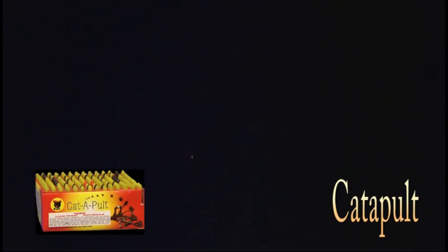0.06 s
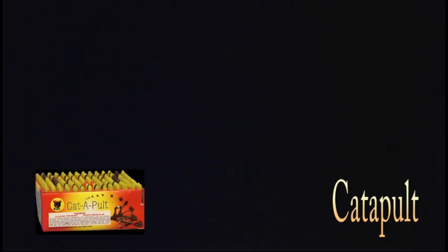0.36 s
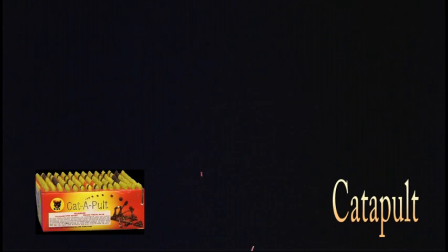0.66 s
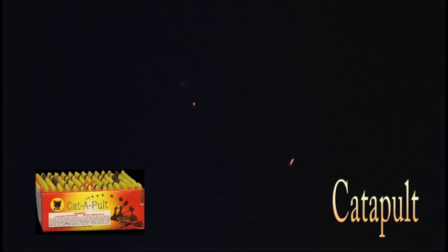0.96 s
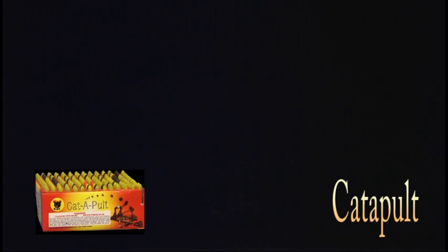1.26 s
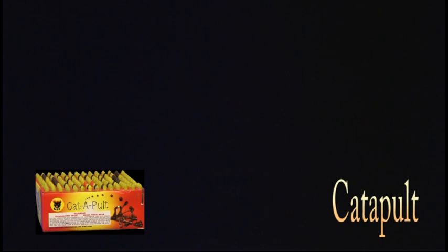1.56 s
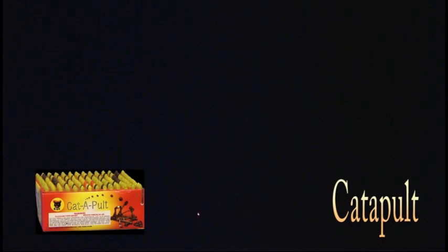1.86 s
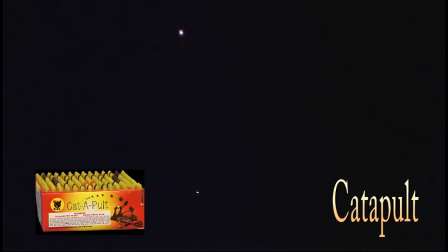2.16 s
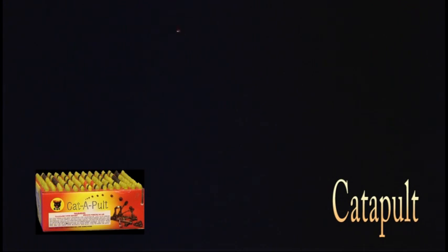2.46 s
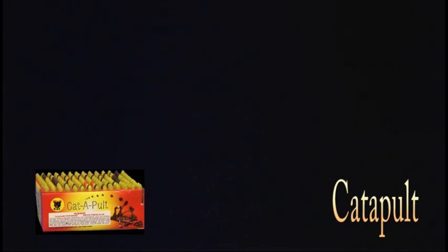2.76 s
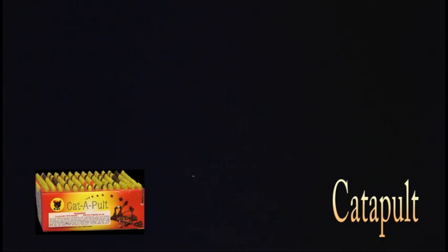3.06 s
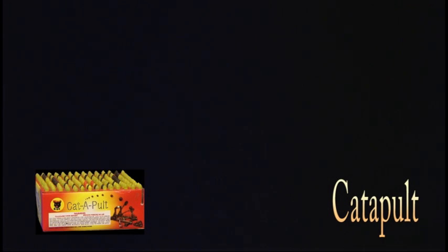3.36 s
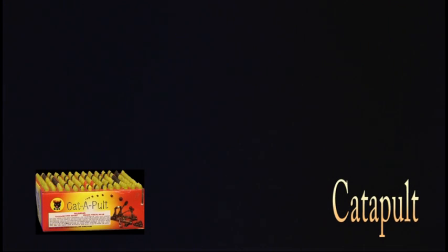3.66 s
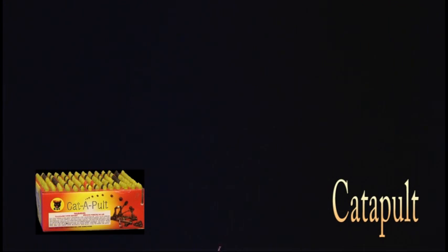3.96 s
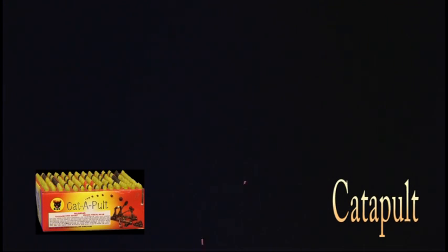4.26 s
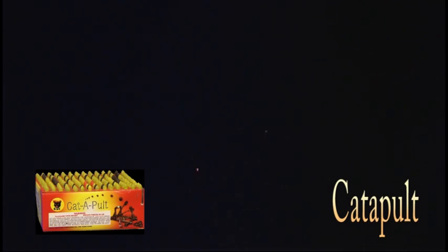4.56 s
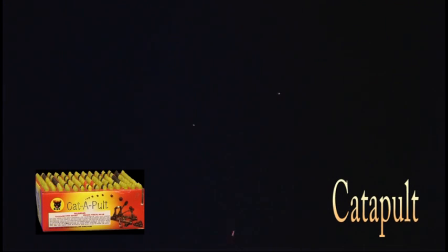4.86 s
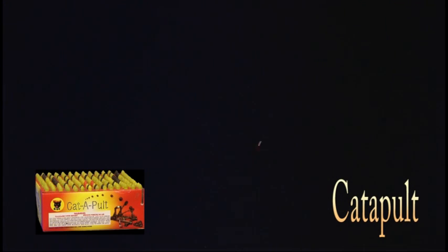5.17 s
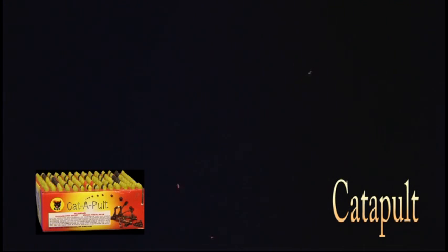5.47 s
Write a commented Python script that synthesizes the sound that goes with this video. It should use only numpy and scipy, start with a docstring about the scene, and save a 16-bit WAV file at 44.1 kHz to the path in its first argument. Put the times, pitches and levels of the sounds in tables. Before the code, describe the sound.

Small firework rockets go off outdoors on a still night. From the start, shrill whistles with a light hiss overlap, wavering and slowly sinking in pitch, over the fading echo of an earlier bang. A sharp, very loud bang hits at 0.5 seconds. A launch pop cracks at 1.3, followed by bangs at about 1.4 and 1.7. Each bang overloads the microphone, slaps off nearby walls and rolls back from distant trees half a second later. The whistles sweep upward as they burn out, the last by 2.1 seconds. A lull follows, with fading echo, faint fizzing and a spark snap at 2.4. Another bang comes at 3.5, with brief fizz and a snap. From 3.8 seconds new whistles enter one after another, bending and piling up, with small launch pops from 4.6, and continue to the end near 5.7 seconds.

```python
"""Outdoors at night, a box of small firework rockets goes off. A small charge pops rockets out of their
tubes. Pulsing flames make them whistle and hiss as they climb, and the pitch sinks as they burn hollow.
Bursts crack loudly enough to overload the microphone, and sparks fizz and snap. The ground and nearby
walls echo within about 50 ms; distant trees answer about half a second later with a long wash."""
import sys
import numpy as np
from scipy import signal
from scipy.fft import rfft, irfft
from scipy.io import wavfile
from scipy.ndimage import map_coordinates

SR = 44100
rng = np.random.default_rng(int(sys.argv[2]) if len(sys.argv) > 2 else 0)


def transcribe(u):
    """Save the signal u as a 16-bit wav file named by the first command-line argument.

    u: samples, shape (n,) or (channels, n), limited to [-1, 1]; the rate is SR.
    q: integer samples, one column per channel.
    """
    v = np.clip(np.atleast_2d(u).T, -1, 1)
    q = np.round(v * 32767).astype(np.int16)
    wavfile.write(sys.argv[1], SR, q)


N = 251811
TIME = np.arange(N) / SR

# whistling rockets: (name, lift-off [s], end [s], starting pitch [Hz], growth of the hollow [share],
# level [dB], fade while flying off [dB/s], overtone boost [dB])
ROCKETS = [("a", -.1, 0.55, 2868, .24, -19.5, 2.3, -2), ("b", .18, 1.5, 3560, .5, -19.5, 0.55, -2.5),
           ("c", .135, 1.258, 3505, .36, -19.5, -0.57, 2.8), ("d", 1.26, 2.09, 3510, .37, -16.5, 10, 3.5),
           ("e", 3.765, 5.75, 3095, .45, -18, 1.8, 2.1), ("f", 4.09, 5.42, 3038, .38, -20, -2.5, 1.7),
           ("g", 4.6, 5.75, 2875, .28, -15, 6.6, 2), ("h", 5.03, 5.75, 2952, .28, -18.5, 1, 2),
           ("i", 5.28, 5.75, 2882, .2, -17.5, 4.2, 0), ("j", 5.64, 5.75, 3000, 0.304, -18.5, 0, 5.7)]
# swerves bend a whistle up and back: (rocket, time [s], half length [s], rise [share], level change [dB])
SWERVES = [("a", .51, .119, .11, 2.7), ("b", .47, .136, .076, -1), ("b", .68, .097, .271, 0.68),
           ("b", 1.125, .089, .096, -0.83), ("c", .77, .095, .115, 0), ("c", 0.98, .09, .255, -1),
           ("c", 1.23, .11, .66, -.5), ("d", 1.822, .042, .114, -11.5), ("e", 4.39, .075, .13, -4.5),
           ("e", 4.86, .083, .041, 0), ("e", 5.225, .19, .085, -3), ("f", 4.4, .119, .049, -1),
           ("f", 4.733, .056, .134, -1.7), ("f", 5.1, .047, .105, 0.62), ("g", 4.825, .159, .046, 0.72),
           ("g", 5.25, .083, .114, -4), ("g", 5.735, .064, 0.14, 2.2), ("h", 5.645, .084, .05, -2.5),
           ("i", 5.338, .025, .164, -5)]
# burn-outs sweep a whistle up: (rocket, start [s], top [s], rise [share], level change [dB])
BURNOUTS = [("b", 1.265, 1.52, 1.1, -21), ("c", 1.176, 1.194, 0.28, -6.5), ("d", 1.905, 2.085, 1.15, -9)]
# the pure tones in a whistle: (multiple of the tube's lowest note, level [dB])
PARTIALS = [(1, -34.5), (2, 4), (3, -18), (4, -16.5), (5, -26), (6, -22), (7, -24), (8, -28), (9, -34.5),
            (10, -33)]
# treble lost on the way to the microphone: (frequency [Hz], level [dB])
AIR_LOSS = [(3000, -5), (5500, -2), (7000, -6.5), (8500, -3.5), (10000, -6), (12000, -6.5), (13500, -19),
            (15000, -15), (16000, -28)]
# bursts: (time [s], level [dB], ground echo lag [ms], wall echo lag [ms], far wall echo lag [ms],
# tree echo level [dB], tree echo stretch [factor])
BURSTS = [(-.27, 19, 7, 21, 40, -1, 1), (.5129, 19, 7.5, 20, 40.8, -5, 1),
          (1.3545, 19, 6.1, 22.3, 39.3, -5, 1), (1.6578, 20, 7.1, 20.4, 40.3, -2.2, 1.13),
          (3.5335, 20, 4.3, 25.1, 37.8, -2, .97)]
# pops of the charges that lift the rockets: (time [s], level [dB])
LAUNCH_POPS = [(1.256, -9), (4.5893, -11.5), (4.766, -24), (5.0328, -17), (5.357, -18.5), (5.626, -11.5),
               (5.69, -13)]
# showers of sparks: (peak time [s], level [dB], rise [dB/s], fall [dB/s])
SPARK_SHOWERS = [(1.68, -25, 1000, 107), (2.2, -44, 20, 53), (2.45, -42, 130, 115), (3.57, -33, 830, 150),
                 (3.7, -36, 114, 90)]
# sharp snaps, the bright crack of the first launch pop and then two sparks: (time [s], level [dB])
SHARP_SNAPS = [(1.258, 1), (2.443, -8), (3.741, -11)]
# what echoes, from close clutter to the farthest trees: (lag [s], level [dB], rise [dB/s], fall [dB/s])
REFLECTORS = [(.04, 23, 1500, 520), (.18, 9.5, 166, 80), (.58, 13.5, 30, 42), (1.0, 2, 22, 14.5)]
# tone colours of the noises and echoes: (frequency [Hz], level [dB])
JET_COLOUR = [(100, -31), (400, -13.5), (1300, -12.5), (2700, 2.5), (4500, 0.5), (7000, -5), (10000, -7),
              (15000, -39)]
FIZZ_COLOUR = [(200, 1), (1500, 0.5), (4000, 3), (8000, -4.5), (11000, -19), (15000, -39)]
CLUTTER_COLOUR = [(100, -25), (300, -10), (600, -3), (1500, 3.5), (2500, -8), (5000, -16.5), (9000, -20.5),
                  (15000, -36)]
TREE_COLOUR = [(60, -27), (150, -16), (220, -16.5), (320, -9), (480, -3), (700, 1), (1000, 1.5),
               (1400, 4.5), (2100, -0.5), (3000, -9), (4500, -9), (8000, -33), (15000, -54)]
NIGHT_COLOUR = [(30, -4), (100, -9), (400, -9), (1200, -9.5), (4000, -15), (9000, -8), (15000, -11)]

TOP_HZ = 15900  # upper limit of the treble


def rockets(direct_db=-3, ground_db=-10, wall_db=-7, far_wall_db=-18, jet_db=-23, sputter_db=-37):
    """All the whistles, with the hiss of their jets, the sputter of their fuel and their echoes."""
    out, power = np.zeros((2, N)), np.zeros((1, N))
    side_ms = 0.0085  # lag between left and right
    for rocket in ROCKETS:
        start, end = rocket[1:3]
        t = np.arange(start, end + .05, 1 / SR)
        tone, thrust = whistle(t, rocket)
        heard = undb(direct_db) * np.array([tone, delayed(tone, side_ms)])
        # as the rocket climbs, the ground echo comes later and the wall echoes sooner
        climb = 1 - np.exp(-(t - start) / .6)
        heard += undb(ground_db) * delayed(tone, 1 + 6 * climb)
        heard += undb(far_wall_db) * delayed(tone, 48 - 8 * climb)
        # the wall stands to the right, so its echo reaches the left side later
        heard += undb(wall_db) * np.array([delayed(tone, 28 - 7 * climb + s * side_ms) for s in (1, -1)])
        add(out, heard, start)
        add(power, thrust[None] ** 2, start)
    jet = undb(jet_db) * noise(JET_COLOUR, 1.0) * undb(2.1 * wander(54))
    sputter = undb(sputter_db) * noise(FIZZ_COLOUR, 0.77)
    out += np.sqrt(power) * (jet + sputter)
    mono = out.mean(0, keepdims=True)
    near = undb(-7) * signal.fftconvolve(mono, scatter(0.18, 1.0))[:, :N]
    far = undb(-18) * signal.fftconvolve(mono, tree_echo(stretch=0.96))[:, :N]
    return pan(out + near, left_db=1.35) + far


def whistle(t, rocket, jitter=0.00752, waver=0.00451, flutter_db=1.75, rasp_db=3.5, patchy_db=3.5):
    """A pulsing flame makes the rocket's tube ring; gives the tone and its strength (thrust)."""
    hz, thrust, overtones_db = flight(t, *rocket)
    thrust = thrust * undb(flutter_db * wander(200, t))
    unsteady = 1 + 1.74 * np.exp(-(t - t[0]) / .06)  # the flame is rougher just after lift-off
    # the pitch one hears is twice the tube's lowest note
    lowest_hz = hz / 2 * (1 + jitter * unsteady * wander(900, t) + waver * wander(70, t))
    phase = 2 * np.pi * np.cumsum(lowest_hz) / SR
    odd_db = -12 * np.clip((lowest_hz - 1350) / 300, 0, 1)  # a high pitch weakens the odd multiples
    tone = 0
    for k, partial_db in PARTIALS:
        k = round(k)
        db = partial_db + curve(AIR_LOSS, k * lowest_hz) + odd_db * (k % 2)
        if k != 2:  # all but the main tone come and go, each on its own
            db += overtones_db + patchy_db * wander(25, t) + rasp_db * wander(300, t) / np.sqrt(2)
        tone = tone + undb(db) * np.sin(k * phase) * (k * lowest_hz < TOP_HZ)
    return np.sqrt(2) * tone * thrust, thrust


def flight(t, name, start, end, first_hz, growth, db, fade_db_per_s, bright_db,
           burn_s=.75, swing_db=7, attack_s=0.04, release_s=0.029):
    """Pitch, thrust and overtone level of one rocket: the note sinks as the tube burns hollow."""
    age = t - start
    hz = first_hz / (1 + growth * (1 - np.exp(-age / burn_s)))
    turn_db = 0
    for who, when, half_s, rise, change_db in SWERVES:
        if who == name:
            # the nozzle points away while the pitch rises and swings back as it falls
            progress = (t - when) / half_s
            bend = np.exp(-progress ** 2)
            hz *= 1 + rise * bend
            turn_db += (change_db + swing_db * progress) * bend
    for who, when, top, rise, change_db in BURNOUTS:
        if who == name:
            sweep = np.sin(np.pi / 2 * np.clip((t - when) / (top - when), 0, 1)) ** 2
            hz *= 1 + rise * sweep
            turn_db += change_db * sweep
    burning = np.clip(np.minimum(age / attack_s, (end - t) / release_s), 0, 1)
    thrust = burning * undb(db - fade_db_per_s * age + turn_db)
    # overtones fade faster with distance and travel in a beam, so turns affect them more
    overtones_db = bright_db - 2 * age + 0.2 * turn_db
    return hz, thrust, overtones_db


def bursts():
    """Each crack arrives directly, off the ground and off the walls, then rolls back from the trees."""
    out = np.zeros((2, N))
    for when, db, ground_ms, wall_ms, far_wall_ms, trees_db, stretch in BURSTS:
        # (lag [ms], level [dB], push [ms]); small surfaces return only treble, a shorter push
        paths = [(0, 1, .24), (3.3, -12, .1), (ground_ms, -3, .25), (wall_ms, 3, .17),
                 (wall_ms + ground_ms, -13, .25), (far_wall_ms, -16, .08)]
        for lag_ms, path_db, push_ms in paths:
            tearing = highpass(scatter(.005), 900)
            crack = lowpass(blast(push_ms), 7000) + tearing + undb(-11) * scatter(.055)
            add(out, pan(undb(db + path_db) * crack, left_db=2.4), when + lag_ms / 1000)
        add(out, undb(db - 5) * scatter(.075), when + wall_ms / 1000)  # the uneven wall smears its echo
        add(out, pan(undb(db + trees_db) * tree_echo(stretch), left_db=-0.0075), when)
    return highpass(out, 337)


def blast(push_ms, size=8192):
    """A blast wave: a sudden push of air, then a longer and weaker pull."""
    progress = (np.arange(size) + .5) / SR * 1000 / push_ms
    return (1 - progress) * np.exp(-progress)


def launches(wall_lag_s=.0285, wall_db=-2, rattle_db=8, thump_hz=155):
    """The lifting charge knocks in its tube and shakes the box; the wall answers."""
    out = np.zeros((2, N))
    cycles = TIME[:8192] * thump_hz
    thump = undb(-38) * np.sin(2 * np.pi * cycles) * cycles * np.exp(1 - 1.3 * cycles)
    for when, db in LAUNCH_POPS:
        for lag_s, path_db in ((0, 0), (wall_lag_s, wall_db)):
            knock = highpass(blast(.2) + undb(rattle_db) * scatter(.03), 480) + thump
            add(out, undb(db + path_db) * knock, when + lag_s)
    return lowpass(out, 3500)


def fizz_and_snaps():
    """Showers of sparks fizz; the first launch pop gives a bright crack, and later two sparks snap."""
    out = noise(FIZZ_COLOUR, 0.71) * swells(SPARK_SHOWERS, TIME) * undb(0.95 * wander(70))
    for when, db in SHARP_SNAPS:
        add(out, highpass(undb(db) * scatter(0.018), 1260), when)
    return out


def scatter(decay_s, likeness=0.97, size=8192):
    """A short noisy tail, as from grass and clutter; it falls 60 dB in decay_s."""
    tail = noise(CLUTTER_COLOUR, likeness, size) * undb(-60 * np.arange(size) / SR / decay_s)
    return tail / np.sqrt(np.sum(tail ** 2) / 2)


def tree_echo(stretch, air_hz=3200, treble_db_per_s=-13, size=2 ** 17):
    """The long echo of distant trees; the air takes more treble from its later parts."""
    lag = np.arange(size) / SR
    wash = noise(TREE_COLOUR, 0.69, size)
    dull = signal.sosfiltfilt(signal.butter(2, air_hz, fs=SR, output="sos"), wash)
    treble = (wash - dull) * undb(treble_db_per_s * lag)
    echo = (dull + treble) * swells(REFLECTORS, lag / stretch)
    return echo / np.sqrt(np.sum(echo ** 2) / 2)


def night():
    """The faint, steady hush of a still night."""
    return undb(-67) * noise(NIGHT_COLOUR, 0.32)


def noise(colour, likeness, size=N, wide_hz=9000):
    """Stereo noise of a given colour; likeness makes left and right alike, mostly below wide_hz."""
    hz, db = np.transpose(colour)
    freqs = np.arange(size // 2 + 1) * SR / size + 1
    gain = undb(np.interp(np.log(freqs), np.log(hz), db))
    alike = np.clip(likeness, 0, 1) / (1 + (freqs / wide_hz) ** 2)
    white = rfft(rng.standard_normal((2, size)))
    mid, side = irfft(white * gain * np.sqrt([1 + alike, 1 - alike]), size)
    both = np.array([mid + side, mid - side])
    return both / both.std()


def wander(rate, at=TIME):
    """A smooth random drift of about 1 either way, with rate new values a second."""
    coarse = at[::16]
    drift = map_coordinates(rng.standard_normal(8192), [coarse * rate], order=2, mode="wrap")
    return np.interp(at, coarse, drift)


def swells(rows, at):
    """The joint gain of sounds that each rise to a peak and die away."""
    gains = [undb(db - np.maximum(abs(rise) * (peak - at), abs(fall) * (at - peak)))
             for peak, db, rise, fall in rows]
    return np.sqrt(sum(gain ** 2 for gain in gains))


def undb(db):
    """Turns decibels into a gain."""
    return np.exp(np.asarray(db) * (np.log(10) / 20))


def curve(rows, at):
    """Joins (place, value) rows with straight lines."""
    return np.interp(at, *np.transpose(rows))


def pan(x, left_db):
    """Places a sound between left and right."""
    return x * undb(np.array([[left_db], [-left_db]]) / 2)


def add(out, x, start):
    """Mixes x into out from the start time on."""
    i = int(round(start * SR))
    a, b = max(i, 0), min(i + x.shape[1], out.shape[1])
    if b > a:
        out[:, a:b] += x[:, a - i:b - i]


def delayed(x, ms):
    """The sound after a detour whose length may change."""
    i = np.arange(len(x))
    return np.interp(i - ms * SR / 1000, i, x, left=0)


def highpass(x, hz):
    """Turns down what lies below hz."""
    return signal.sosfilt(signal.butter(2, hz, "high", fs=SR, output="sos"), x)


def lowpass(x, hz):
    """Turns down what lies above hz."""
    return signal.sosfilt(signal.butter(2, hz, fs=SR, output="sos"), x)


def scene():
    """Rockets, sparks, bursts and launches over a still night."""
    return night() + highpass(rockets() + fizz_and_snaps(), 320) + bursts() + launches()


def record(dry):
    """The cracks overload the microphone and clip flat; the highest treble is cut."""
    clipped = np.clip(dry, -1, 1)
    return signal.sosfilt(signal.ellip(8, .2, 60, TOP_HZ, fs=SR, output="sos"), clipped)


dry = scene()
out = record(dry)
transcribe(out)
```